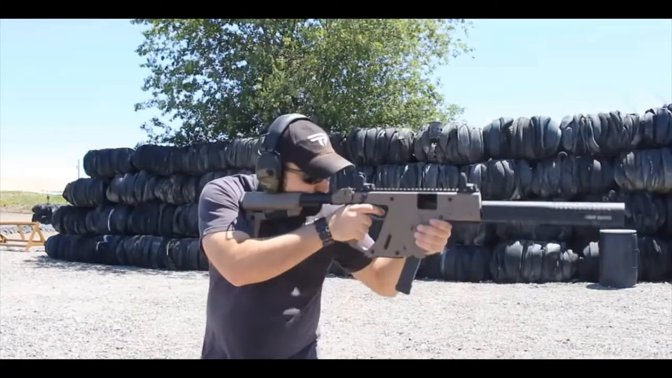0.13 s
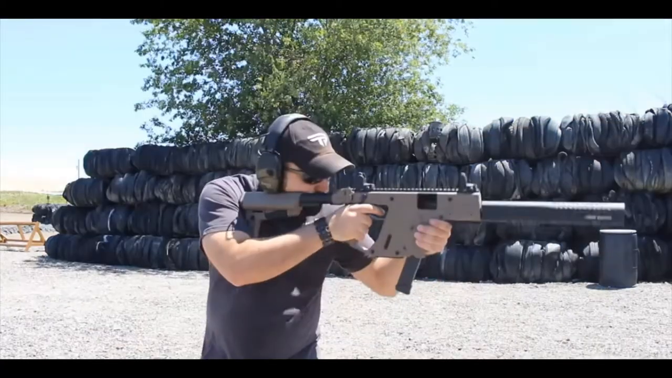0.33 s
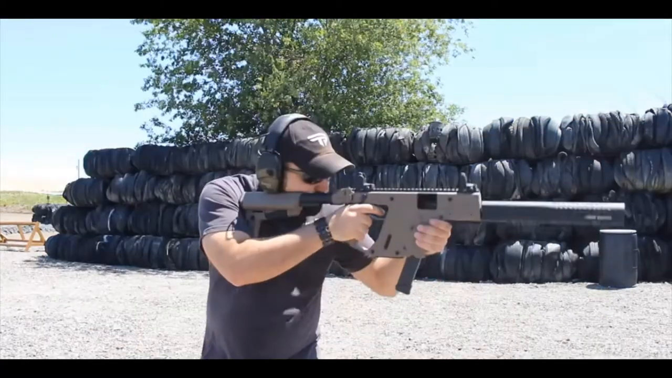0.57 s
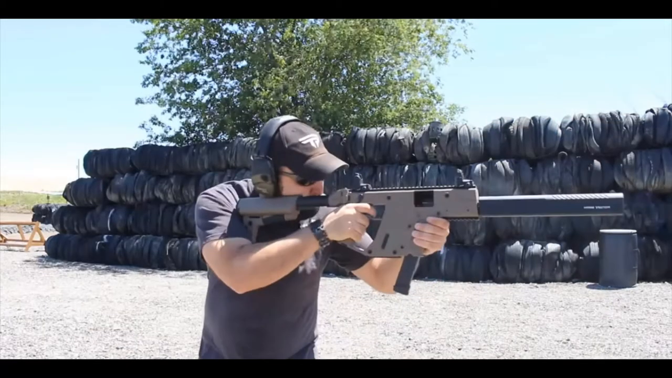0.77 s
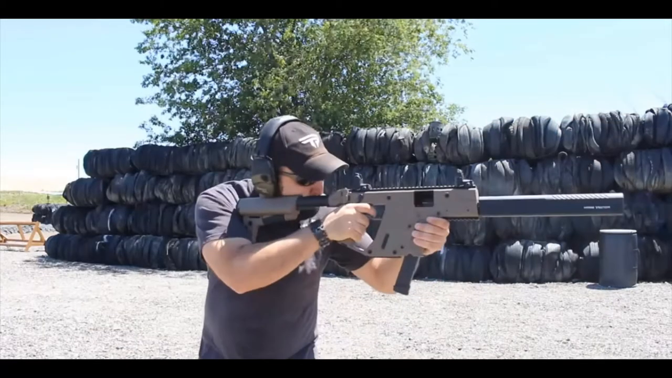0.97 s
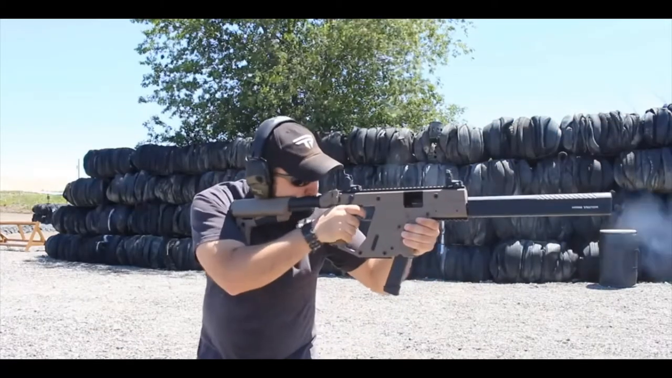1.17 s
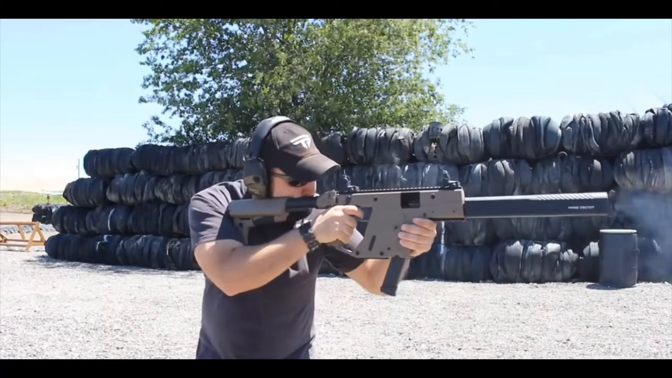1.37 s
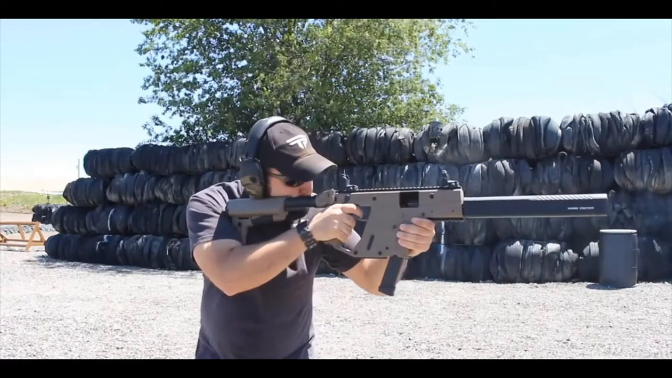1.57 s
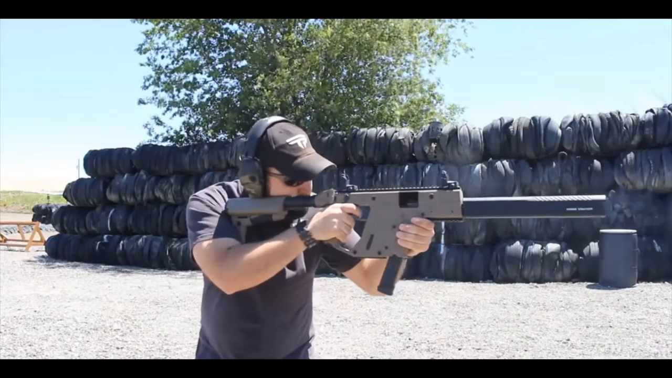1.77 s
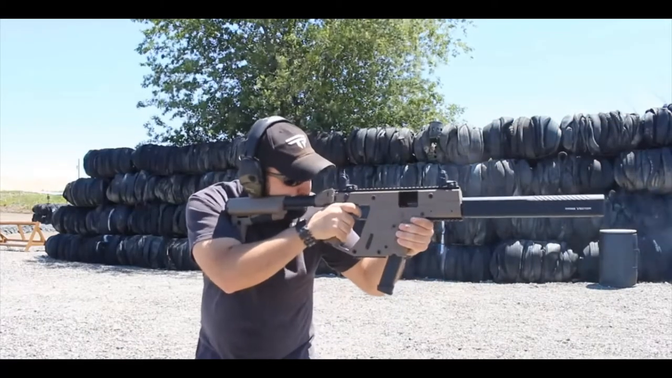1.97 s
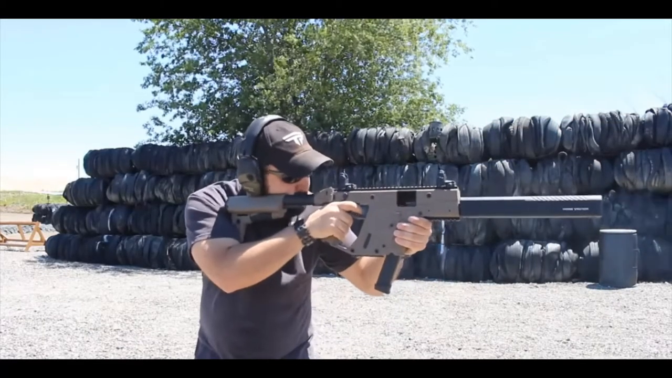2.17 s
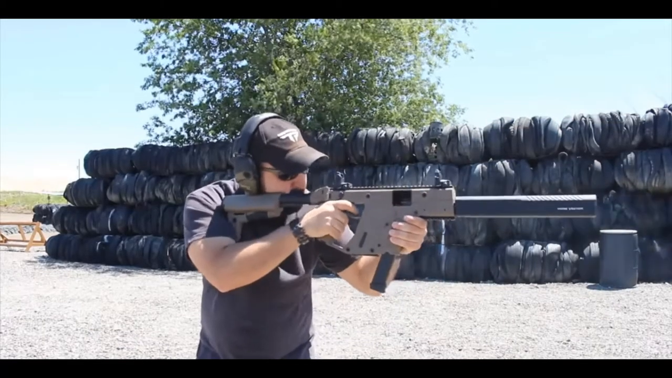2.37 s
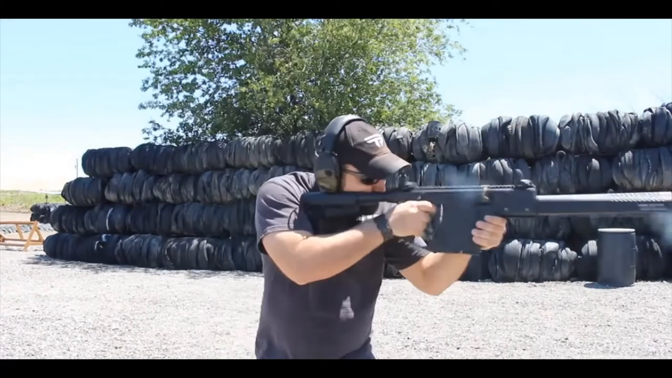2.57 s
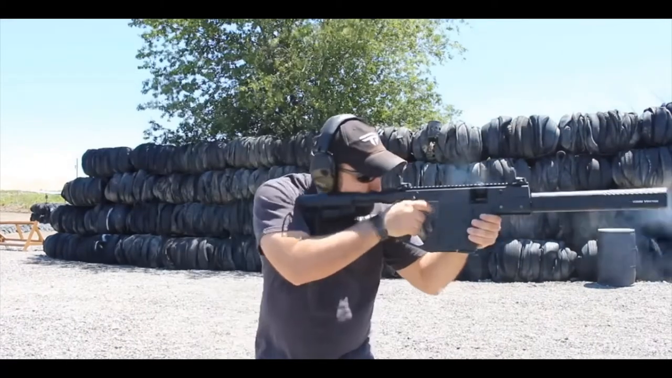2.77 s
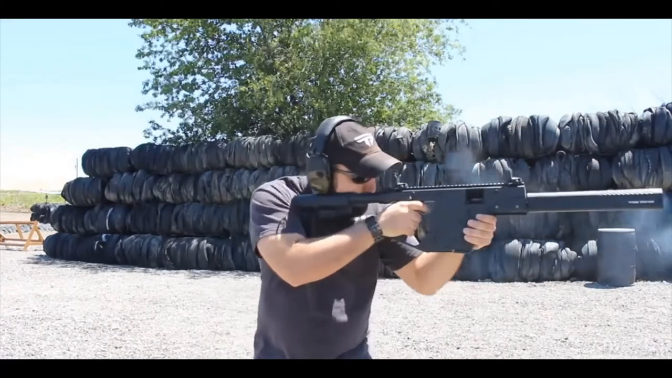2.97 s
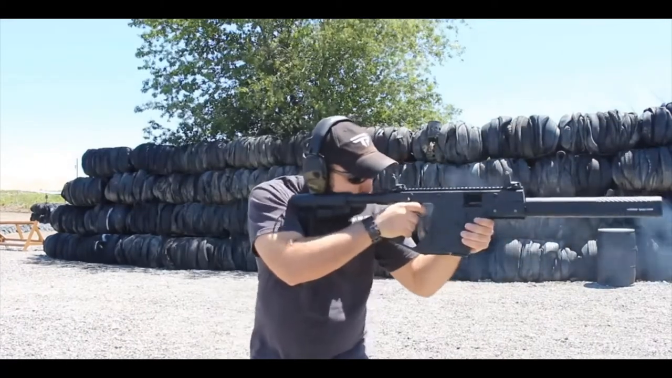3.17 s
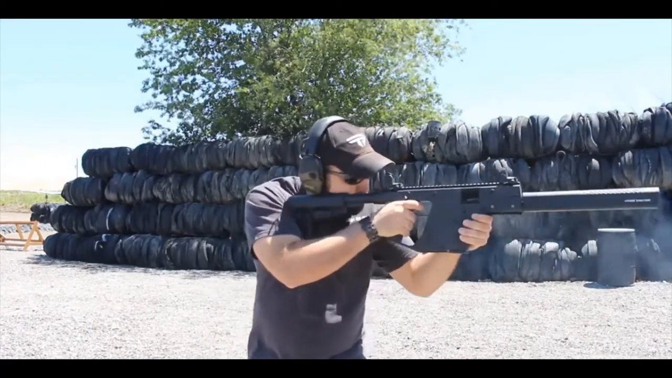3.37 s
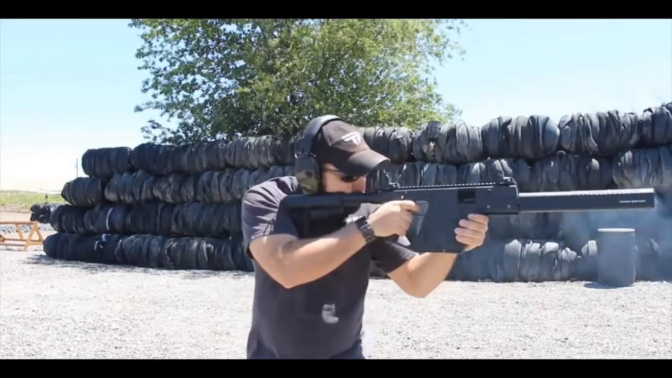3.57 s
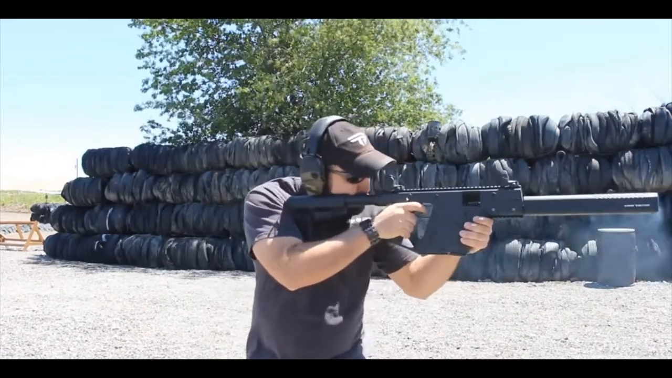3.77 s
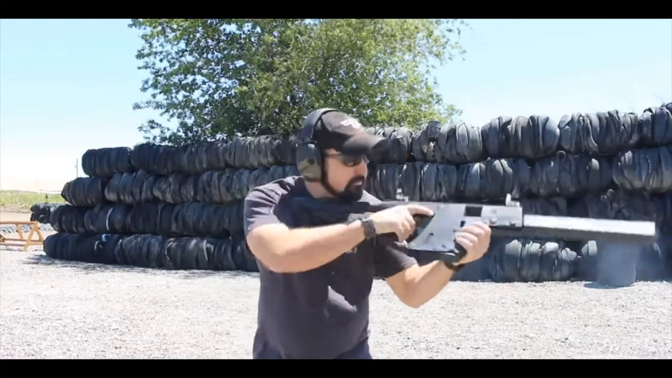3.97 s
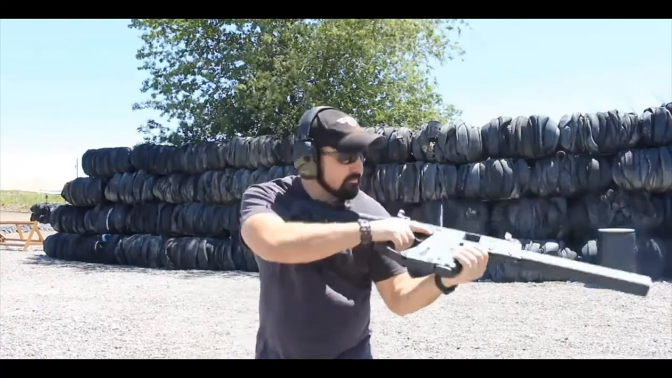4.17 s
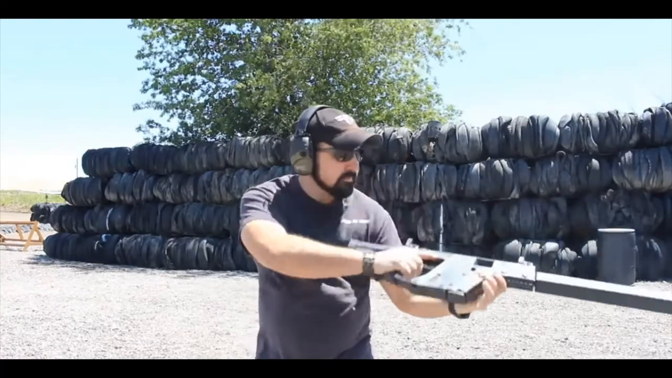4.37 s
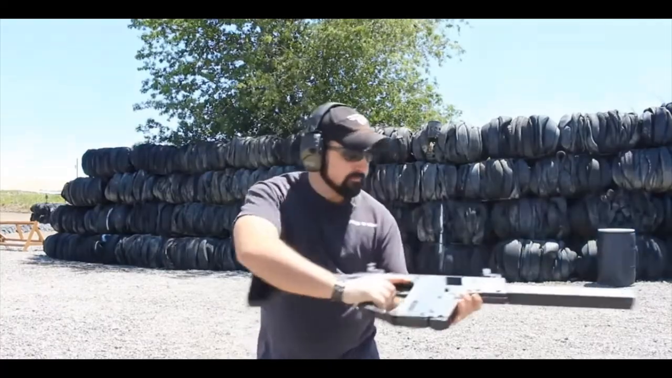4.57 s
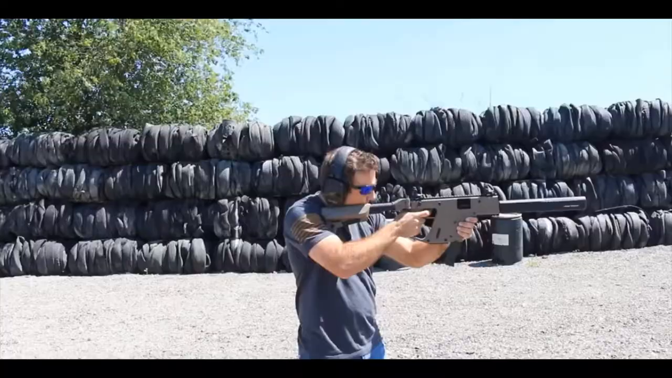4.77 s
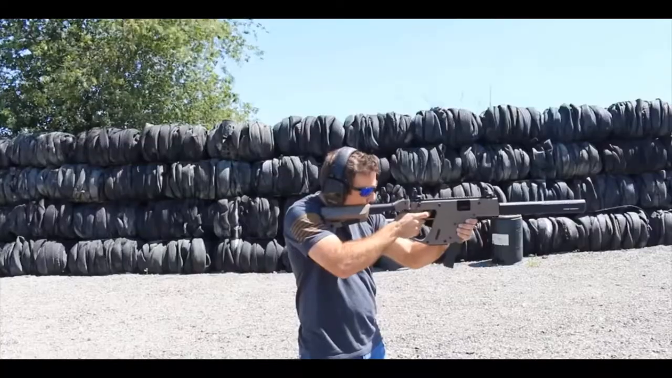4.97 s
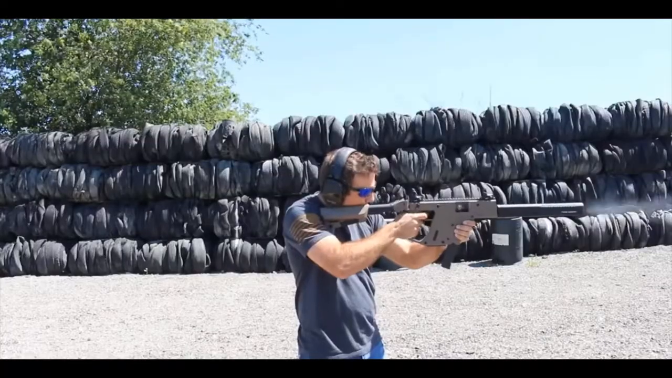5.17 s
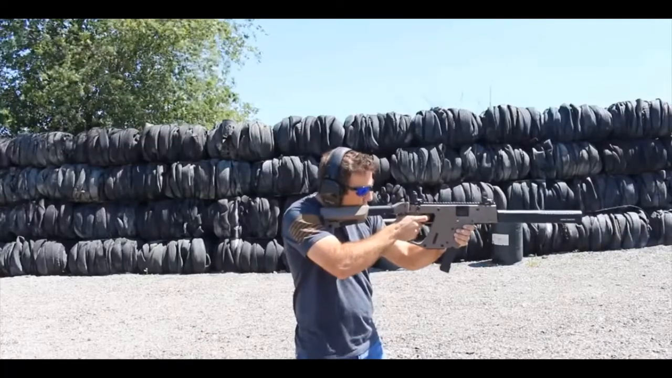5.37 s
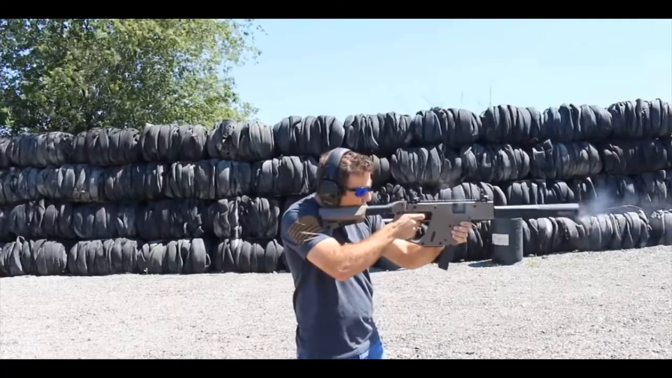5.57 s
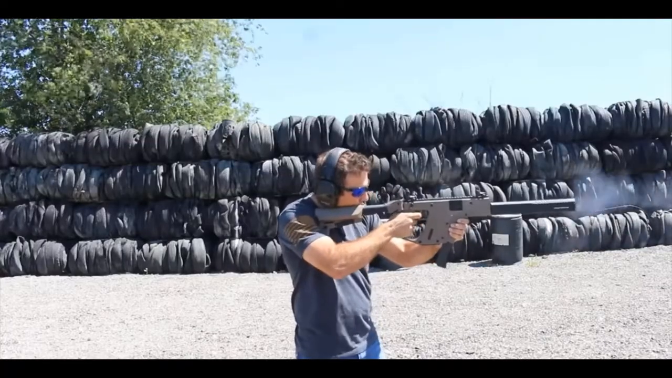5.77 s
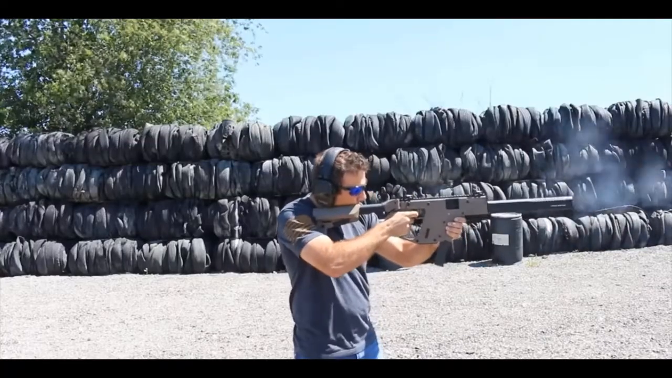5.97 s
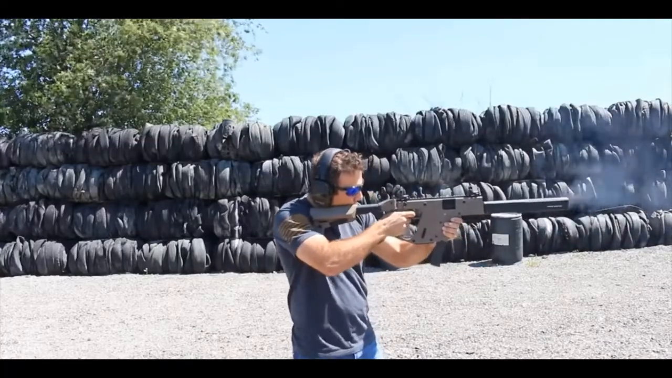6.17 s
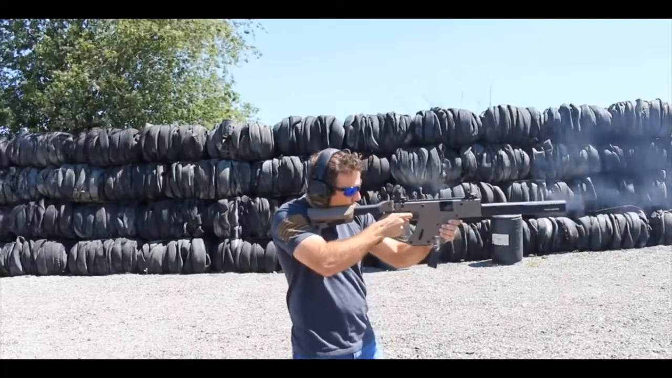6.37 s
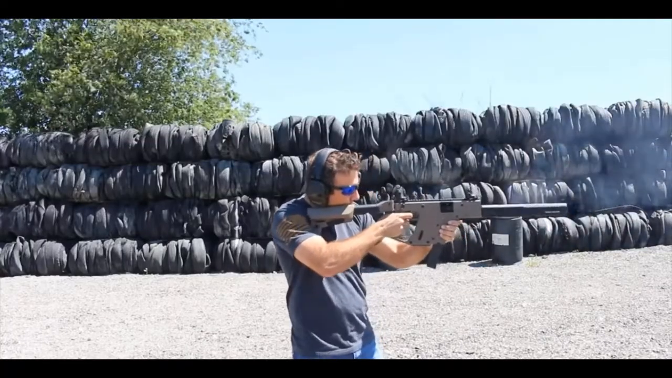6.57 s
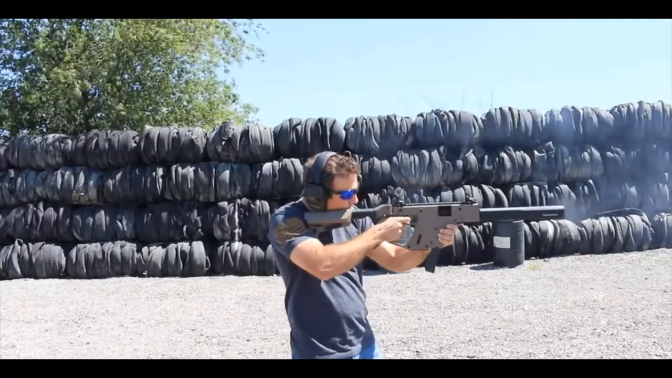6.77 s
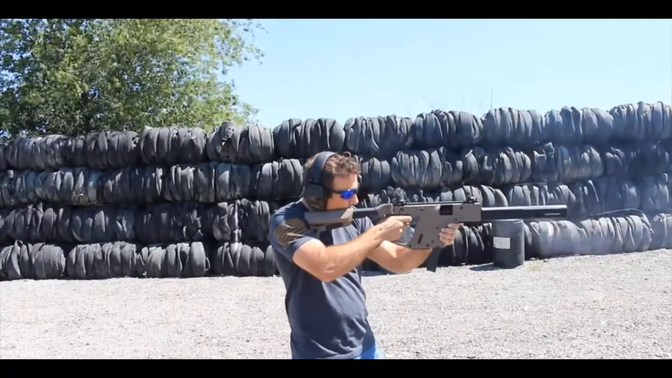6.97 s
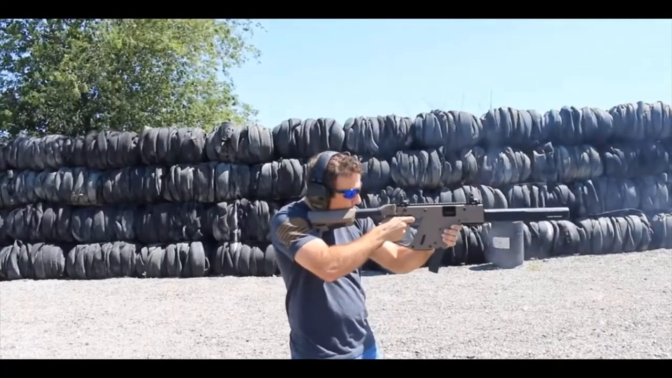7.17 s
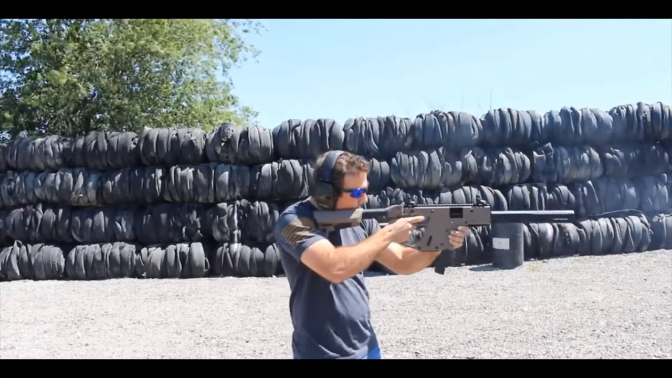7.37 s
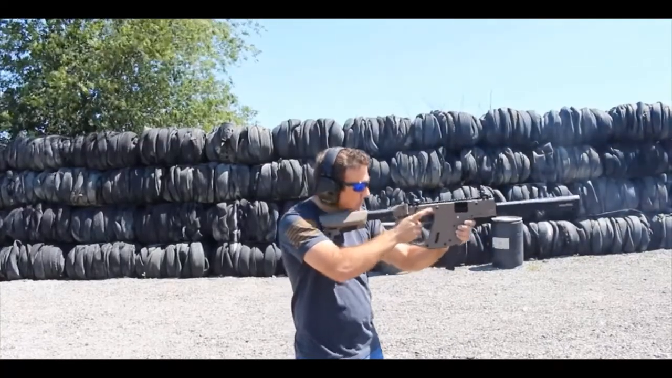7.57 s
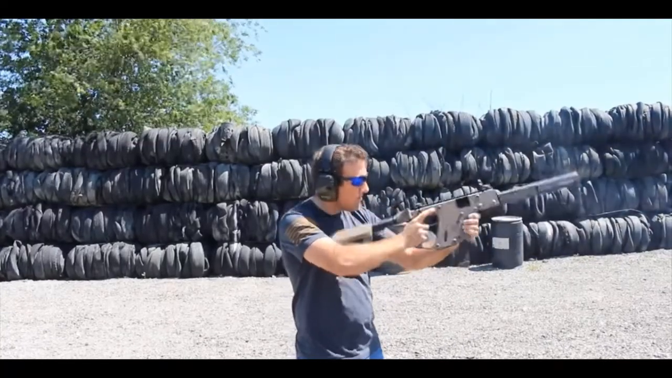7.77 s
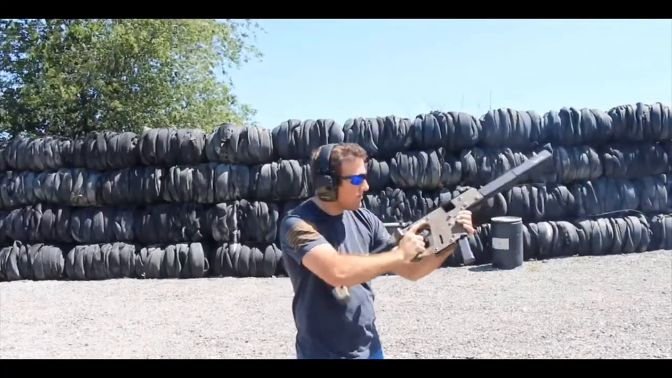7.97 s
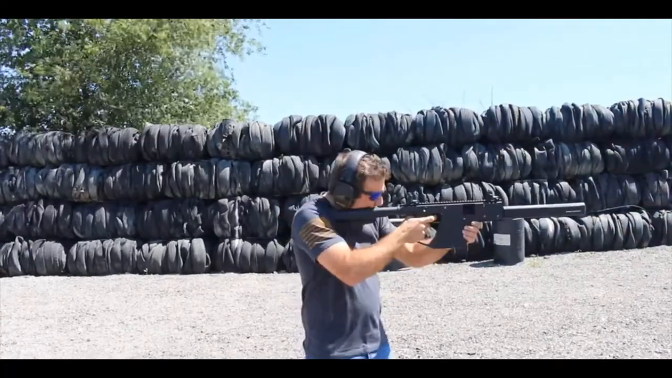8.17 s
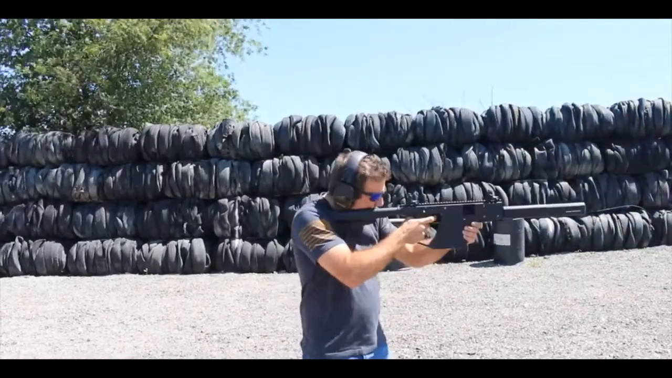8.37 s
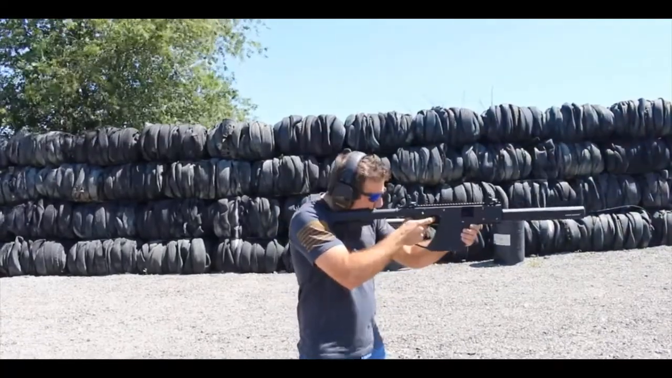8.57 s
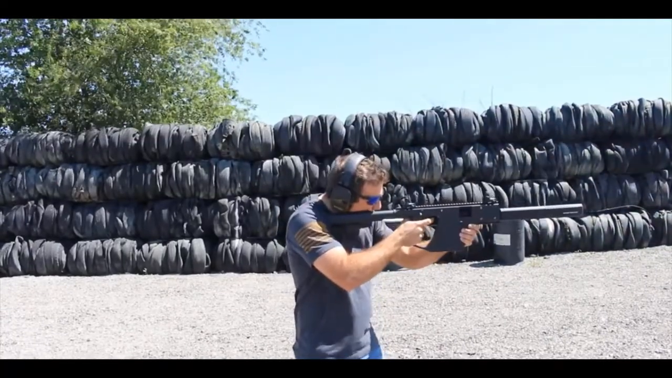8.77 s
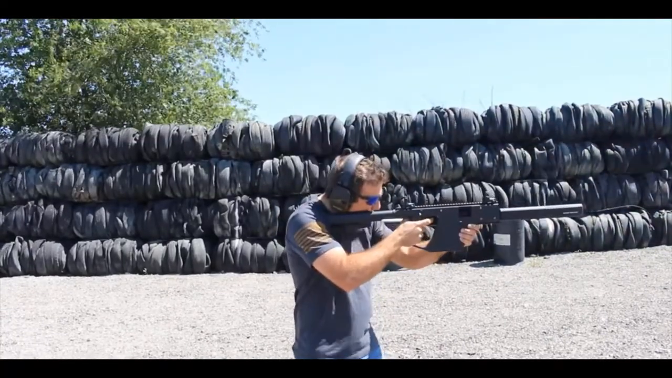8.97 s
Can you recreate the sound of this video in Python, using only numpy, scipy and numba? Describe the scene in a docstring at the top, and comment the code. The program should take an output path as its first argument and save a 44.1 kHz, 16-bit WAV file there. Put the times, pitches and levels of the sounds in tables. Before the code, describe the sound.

On an open gravel range walled with stacked tyres, a nearby carbine with a long suppressor fires thirteen shots at about six per second, then six more after a brief break. Brass tinkles and the gun clicks. After a near-silent gap a third string of ten shots rings out, followed by a hard mechanical clack with a hollow knock, faint tinkles and a wind rumble. Single mono microphone a few metres away, loud shots compressed.

```python
"""Carbine strings on a tyre-walled range

Gravel range walled with stacked tyres, mono camera microphone a few metres from the shooter: three rapid strings.
Each shot is a noise crack and gas jet, a sliding low thump, and echoes of banded noise with hollow tyre booms.
In the pauses, spent cases tinkle as ringing modes on gravel and the gun is handled in noise clicks and a hollow knock.
Shaped noise makes the wind buffeting and the faint open air; a compressor squeezes the loud shots."""
import sys
import numpy as np
from scipy import signal
from scipy.fft import rfft, irfft
from scipy.io import wavfile
from scipy.ndimage import uniform_filter1d
from numba import njit

SR = 44100
rng = np.random.default_rng(int(sys.argv[2]) if len(sys.argv) > 2 else 0)


def rack_gain(trim_db):
    """Turn a fader trim in dB into the linear factor to multiply a signal by."""
    fader = np.asarray(trim_db, float)
    return 10 ** (fader / 20)


def put_to_file(sound):
    """Save the sound as 16-bit audio at rate SR, in the file named by the first command-line argument."""
    columns = np.atleast_2d(sound).T  # one column per channel
    safe = np.clip(columns, -1, 1)
    whole_steps = np.round(safe * 32767)
    wavfile.write(sys.argv[1], SR, whole_steps.astype(np.int16))


N = 397782
T = np.arange(N) / SR

# Shots: t/s, blast level/dB, thump level/dB relative to the blast
SHOTS = [(0.2953, -4.5, -0.5), (0.4858, -2.5, -6.5), (0.6541, -2, -5), (0.822, -3, -6.5),
         (0.9907, -2.5, -4.5), (1.1616, -2.5, -4.5), (1.3377, -3, -4.5), (1.514, -2, -6),
         (1.6896, -2.5, -4.5), (1.8646, -2, -5.5), (2.0288, -3, -1), (2.206, -2.5, -3.5),
         (2.408, -2.5, -3.5), (2.7373, -3.5, -4), (2.9227, -3.5, -4.5), (3.0833, -3, -5), (3.253, -3, -5.5),
         (3.4229, -2.5, -5.5), (3.5802, -3.5, -4), (5.3498, -3, -4.5), (5.5793, -2, -6.5),
         (5.7726, -2.5, -7), (5.9473, -3, -6), (6.1223, -4.5, -4.5), (6.3067, -4, -6.5), (6.505, -1.5, -7),
         (6.7076, -2.5, -6), (6.9033, -2, -8), (7.097, -2, -6)]
# Aim of each string: start t/s, late echo level/dB, far bank level/dB, thump echo level/dB
STRINGS = [(0, 3, 0, -6), (2.7, -1, 0.5, 0), (5, 1.3, 1.5, -16)]
# Spectrum of crack and gas jet: f/Hz, relative level/dB per Hz
MUZZLE_COLOUR = [(300, -13), (2500, -2), (5000, -11), (8000, -7.5), (14000, -13.5), (17000, -21)]
CRACK_DB, JET_DB = -8.5, -4.5  # relative to the blast
# Short dry cracks just ahead of one shot: t/s, level/dB
SNAPS = [(6.665, -15.5), (6.681, -21), (6.6915, -14)]
# One shot thumps twice: t/s, level/dB
SECOND_THUMP = 2.435, -1.8
THUMP_ECHO_S = 0.057  # the long tyre wall returns the thump
# Spectrum of the echo field: f/Hz, relative level/dB per Hz
ROAR_COLOUR = [(35, -34), (60, -19.5), (118, -6), (164, -7), (458, 5), (822, -6.5), (1340, -2),
               (1740, -12.5), (2190, -4), (3500, -11), (4860, -19), (6900, -11.5), (10800, -21.5),
               (13300, -16), (16000, -30)]
# Echo decay: f/Hz, near-wall t60/s, far-bank t60/s, far-bank level/dB
DECAY = [(99, 0.13, 0.88, -33.5), (445, 0.14, 0.6, -30.5), (2100, 0.17, 0.8, -33.5),
         (4040, 0.22, 0.6, -28.5), (7000, .16, 0.45, -28.5), (12960, .12, 0.24, -30.5)]
# Wall echoes: delay t/s, level/dB at 300 Hz, level/dB at 2 kHz, level/dB at 10 kHz
WALLS = [(.009, -13.5, -7, -2.5), (0.018, -12, -2.5, 0), (0.037, -16, -1, -1.5), (0.051, 1, 6, 1.5),
         (.075, -8.5, -2.5, -2), (.1, -17, -7, -9), (.125, -14.5, -14.5, -25)]
LATE_S = 0.07  # echoes after this come from down the range and change with the aim
# An edit cut chops the echo tail off until the next string: start t/s, end t/s
ECHO_CUT = 2.645, 2.73
# Share of the echo noise that repeats from shot to shot: f/Hz, share/0-1
REPEATED_SHARE = [(300, 0.78), (1200, 0.5), (2500, .35), (6000, 0.2)]
MOVE_S = 4.85  # the shooter stands on another spot from here
# Tyre-stack booms, one list per firing spot: delay t/s, level/dB relative to the blast
BOOMS = [
    [(.052, -6.5), (.059, -5.5), (.069, -18), (.078, -8), (.084, -1), (.1, -19.5), (.121, -24.5),
     (.131, -31)],
    [(.047, 1.5), (.054, -8), (.066, -10.5), (.078, -14.5), (.093, -20), (.116, -22)],
]
# Cavity tones of the hollow tyres: f/Hz, level/dB
TYRE_TONES = [(400, 1), (480, 0), (1150, -13)]
TYRE_T60_S = 0.03
# Spent cases bouncing: t/s, click level/dB, ring level/dB before the mode levels
CASES = [(3.8691, -34, -49), (3.8929, -50, -60.5), (3.9642, -44.5, -72), (4.0664, -62, -64),
         (4.1475, -53, -64.5), (4.2253, -57.5, -54), (4.2435, -58.5, -69), (4.4134, -45.5, -60),
         (4.425, -51, -50), (4.5613, -42, -51), (7.3704, -58, -51), (7.421, -49, -70), (7.4823, -43.5, -47),
         (7.8535, -59, -55), (7.9746, -60, -61), (8.5184, -55, -59), (8.6531, -52, -68), (8.8443, -67, -67)]
# Brass modes: f/Hz, t60/s, level/dB on the first spot, level/dB on the second
CASE_MODES = [(6982, 0.08, 0, -25), (11500, 0.078, -14, 0)]
# Hands and moving parts on the gun: t/s, level/dB, centre f/Hz, t60/s
HANDLING = [(0.141, -57, 2700, 0.07), (0.206, -28.5, 470, 0.09), (0.208, -49, 1500, 0.11),
            (0.233, -47, 2700, 0.16), (0.266, -49, 6000, 0.03), (2.707, -38, 2060, 0.033),
            (3.744, -44, 2850, 0.025), (3.87, -36, 1200, .04), (3.891, -34, 1330, 0.05),
            (4.107, -60, 1310, 0.04), (4.476, -45, 1138, 0.05), (4.493, -48, 600, 0.055),
            (7.289, -23.5, 2500, 0.073), (7.633, -19.5, 2420, 0.04), (7.692, -47, 2266, 0.13),
            (7.775, -51, 947, 0.025), (7.798, -42.5, 4610, 0.015), (8.108, -46.5, 3540, 0.031),
            (8.363, -56.5, 1027, 0.044), (8.413, -48, 1250, 0.075), (8.465, -46, 929, 0.06),
            (8.482, -49, 1500, .04), (8.538, -51, 1026, 0.051)]
# Slap and its rebound: t/s
KNOCK_TIMES = [7.632, 7.694]
# Strength of slap and rebound: level/dB
KNOCK_LEVELS = [-20, -30]
# Modes of the hollow part: f/Hz, level/dB, t60/s
KNOCK_MODES = [(90.4, -5, 0.34), (312.3, -0.5, 0.27), (1109, -20, .1), (2350, -9, 0.062), (2440, -8, 0.049),
               (3650, -12, .06), (4320, -15, .05), (5500, -17, .05), (5860, -14, 0.057)]
KNOCK_DAMPED_S, DAMP_T60_S = 7.77, 0.05  # a hand stops the ring
# Wind before its puffs: t/s, level/dB
WIND_LEVEL = [(0, -44.5), (.15, -50.5), (.3, -42), (2.64, -41), (3.85, -49), (4.0, -52), (4.09, -43.5),
              (4.2, -54), (4.49, -55), (4.52, -70), (4.84, -70), (4.865, -56.5), (5.1, -64), (5.33, -61),
              (7.4, -60), (7.46, -70), (7.8, -59), (8.13, -57), (8.16, -44.5), (8.3, -50.5), (8.46, -38),
              (8.62, -40.5), (8.66, -28.5), (8.72, -26), (8.79, -14), (8.87, -27), (8.92, -37), (9.02, -46)]
# Spectrum of the wind eddies: f/Hz, relative level/dB per Hz
WIND_COLOUR = [(15, -33.5), (25, -20), (59, 5), (140, 6.5), (271, -11.5), (352, -12.5), (849, -40.5),
               (1220, -39.5), (3000, -59.5), (3900, -95.5), (6600, -120)]
# Open-air hiss before its flicker: t/s, level/dB
AIR_LEVEL = [(0, -78), (.1, -70.5), (4.0, -67), (4.2, -69), (4.86, -66), (5.02, -63), (5.33, -65.5),
             (7.8, -67.5), (8.4, -63), (8.6, -58.5), (8.7, -59.5), (8.85, -66), (9.02, -70)]
# Spectrum of the open air: f/Hz, relative level/dB per Hz
AIR_COLOUR = [(150, -24), (250, -6.5), (330, -3), (452, -2.5), (831, -13), (1120, -6), (1760, -14),
              (2490, -11.5), (4820, -23), (7060, -16.5), (10500, -25.5), (14900, -26), (16000, -22.5)]


def carbine():
    """A 4 ms crack, a 5 ms gas jet and a thump; a strong thump pins the membrane and mutes the roar."""
    s, blast_db, thump_db = np.transpose(SHOTS)
    start, *aim_db = np.transpose(STRINGS)
    string = np.searchsorted(start, s, "right") - 1
    late_db, far_db, echo_db = (db[string] for db in aim_db)
    snap_s, snap_db = np.transpose(SNAPS)

    cracks = spikes(s + 0.0018, rack_gain(blast_db + CRACK_DB)) + spikes(snap_s + 0.0018, rack_gain(snap_db))
    jets = spikes(s + 0.0074, rack_gain(blast_db + JET_DB))
    gate = uniform_filter1d(cracks, size=160) * 160 + uniform_filter1d(jets, size=220) * 220
    gate = uniform_filter1d(gate, size=20)  # softens the edges
    muzzle = gate * coloured(rng.standard_normal(N), MUZZLE_COLOUR)

    push = spikes(s + 0.0065, rack_gain(blast_db + thump_db))
    push += spikes(s + THUMP_ECHO_S, rack_gain(blast_db + thump_db + echo_db))
    push += spikes([SECOND_THUMP[0]], [rack_gain(SECOND_THUMP[1])])

    pinned = uniform_filter1d(spikes(s + 0.015, rack_gain(6.9 * thump_db)), size=300) * 300
    pinned = uniform_filter1d(pinned, size=60)
    roar = echoes(s, blast_db, late_db, far_db) / (1 + 5 * pinned)
    return muzzle + thump(push) + roar


def thump(push):
    """The gas bubble swings ever slower as it grows: a boom that slides down within 25 ms."""
    t = np.arange(3500) / SR
    hz = 55 + 360 * np.exp(-t / 0.0075)
    boom = -np.sin(2 * np.pi * np.cumsum(hz) / SR) * np.exp(-t / 0.012)
    boom += rack_gain(-14) * np.sin(2 * np.pi * 42 * t) * np.exp(-t / 0.015)  # rebound of the displaced air
    return signal.oaconvolve(push, boom)[:N]


def echoes(s, blast_db, late_db, far_db):
    """Every half-octave swells at the wall echoes, flutters, and dies at its own rate."""
    noise = rfft(scatter(s))
    octave = np.log2(np.maximum(np.fft.rfftfreq(N, 1 / SR), 1))
    delay, *wall_db = np.transpose(WALLS)
    arrivals = (s[:, None] + delay).ravel()
    shot_db = blast_db[:, None] + late_db[:, None] * (delay > LATE_S)
    banks = rack_gain(2 * np.interp(T, s, far_db))  # doubled dB: these are powers
    out = booms(s, blast_db)
    for hz in 60 * 2 ** np.arange(0, 8.3, 0.5):
        window = np.cos(np.pi * np.clip(octave - np.log2(hz), -0.5, 0.5)) ** 2
        band = irfft(noise * window, N)
        gain_db = [at(list(zip((300, 2000, 10000), row)), hz) for row in np.transpose(wall_db)]
        power = spikes(arrivals, rack_gain(2 * (shot_db + gain_db)).ravel())
        power = uniform_filter1d(power, size=300, origin=149)  # a rough wall spreads its echo over 7 ms
        # fade() drops power by 30 dB per given time, so half the t60
        near = fade(power, at(DECAY, hz) / 2)
        far = fade(power * banks, at(DECAY, hz, column=2) / 2)
        total = near + rack_gain(2 * at(DECAY, hz, column=3)) * far
        out = out + band * rack_gain(2.8 * walk(70)) * np.sqrt(np.abs(total))
    return out * ((T < ECHO_CUT[0]) | (T > ECHO_CUT[1]))


def scatter(s):
    """Echo-field noise: the same walls give much the same bass pattern for every shot from one spot."""
    last = s[np.maximum(np.searchsorted(s, T) - 1, 0)]
    since = np.clip((T - last) * SR, 0, N // 2 - 1).astype(int)
    since += (T > MOVE_S) * (N // 2)  # another pattern on the second spot
    share = at(REPEATED_SHARE, np.maximum(np.fft.rfftfreq(N, 1 / SR), 1))
    repeated = rng.standard_normal(N)[since]
    fresh = rng.standard_normal(N)
    mixed = np.sqrt(share) * rfft(repeated) + np.sqrt(1 - share) * rfft(fresh)
    return coloured(irfft(mixed, N), ROAR_COLOUR)


def booms(s, blast_db):
    """Each tyre stack answers a shot with a short swell of its cavity tones."""
    hits = 0
    for spot, table in enumerate(BOOMS):
        here = (s > MOVE_S) == spot
        delay, db = np.transpose(table)
        hits = hits + spikes((s[here, None] + delay).ravel(), rack_gain(blast_db[here, None] + db).ravel())
    swell = 2 * np.log(1000) / (TYRE_T60_S * SR)
    out = 0
    for hz, db in TYRE_TONES:
        once = ring(hits, hz, TYRE_T60_S)
        out = out + rack_gain(db) * swell * ring(once, hz, TYRE_T60_S)  # ringing twice rounds the attack
    return out


def cases():
    """A bright tick on the stones sets two brass modes ringing; the cases roll on between bounces."""
    s, click_db, ring_db = np.transpose(CASES)
    out = sum(burst(t, db, 5700, 1.28, 0.025) for t, db in zip(s, click_db))
    rolling = rack_gain(-35.5) * rng.standard_normal(N)
    for hz, t60, first_db, second_db in CASE_MODES:
        spot_db = np.where(s > MOVE_S, second_db, first_db)
        bounce = spikes(s, rack_gain(ring_db + spot_db))
        out = out + ring(bounce + rolling * fade(bounce, 0.57), hz, t60)
    return out


def handling():
    """Clicks and scuffs, and a slap with its rebound that rings a hollow part, building for a moment."""
    clicks = sum(burst(s, db, hz, 1.23, t60) for s, db, hz, t60 in HANDLING)
    slap = spikes(KNOCK_TIMES, rack_gain(KNOCK_LEVELS))
    knock = 0
    for hz, db, t60 in KNOCK_MODES:
        # taking away a faster decay makes the ring build up
        knock = knock + rack_gain(db) * (ring(slap, hz, t60) - ring(slap, hz, 0.2 * t60))
    held = 1000 ** (-np.maximum(T - KNOCK_DAMPED_S, 0) / DAMP_T60_S)
    return clicks + held * knock


def wind():
    """Low eddies reach the microphone in uneven puffs, with random slaps ringing the membrane."""
    level = curve(WIND_LEVEL) * rack_gain(2.5 * walk(14))  # puffs: dB, steps per s
    eddies = coloured(rng.standard_normal(N) * rack_gain(2.4 * walk(50)), WIND_COLOUR)
    slaps = (rng.random(N) < 90 / SR) * rng.standard_normal(N)  # about 90 per s
    membrane = rack_gain(-9) * ring(slaps, 520, 0.011) + rack_gain(-31) * ring(slaps, 2000, 0.0027)
    return level * (eddies + membrane)


def air():
    """Faint hiss of the open range: shaped noise, flickering a little."""
    return curve(AIR_LEVEL) * rack_gain(0.52 * walk(28)) * coloured(rng.standard_normal(N), AIR_COLOUR)


def at(table, hz, column=1):
    """A table over frequency, read on a log axis."""
    table = np.array(table, float)
    return np.interp(np.log(hz), np.log(table[:, 0]), table[:, column])


def curve(table):
    """A level/dB curve along time, as gain."""
    return rack_gain(np.interp(T, *np.transpose(table)))


def coloured(x, table):
    """Noise given a spectrum, rms 1."""
    hz = np.maximum(np.fft.rfftfreq(N, 1 / SR), 1)
    y = irfft(rfft(x) * rack_gain(at(table, hz)), N)
    return y / y.std()


def spikes(s, gain):
    """One impulse for each event."""
    return np.bincount((np.asarray(s) * SR).astype(int), gain, N)


def fade(x, t60):
    """Exponential tail after each impulse, down to a thousandth after t60 seconds."""
    return signal.lfilter([1], [1, -1000 ** (-1 / (t60 * SR))], x)


def ring(x, hz, t60):
    """One decaying mode, peak near 1 for a unit impulse."""
    r = 1000 ** (-1 / (t60 * SR))
    turn = 2 * np.pi * hz / SR
    return signal.lfilter([0, r * np.sin(turn)], [1, -2 * r * np.cos(turn), r * r], x)


def walk(rate):
    """Random levels, a new one every 1 / rate s, joined by ramps; spread a little under 1."""
    k = int(SR / rate)
    return uniform_filter1d(np.repeat(rng.standard_normal(N // k + 1), k), k)[:N]


def burst(s, db, hz, width, t60):
    """A short fading puff of noise from hz / width to hz * width."""
    i, t = int(s * SR), np.arange(6000) / SR
    band = signal.butter(1, [hz / width, hz * width], "bandpass", fs=SR)
    puff = signal.lfilter(*band, rng.standard_normal(len(t)))
    out = np.zeros(N + len(t))
    out[i:i + len(t)] = rack_gain(db) * puff / puff.std() * 1000 ** (-t / t60)
    return out[:N]


def scene():
    """Everything reaches one microphone, copied to both channels."""
    return np.tile(carbine() + cases() + handling() + wind() + air(), (2, 1))


@njit
def follow(x, attack, release):
    """Envelope that rises fast and falls slowly."""
    e, out = 0., np.empty(len(x))
    for i in range(len(x)):
        a = abs(x[i])
        e += (a - e) * (attack if a > e else release)
        out[i] = e
    return out


def low_pass(x):
    """Removes everything above the highest recorded frequency."""
    return signal.sosfilt(signal.butter(12, 16980, fs=SR, output="sos"), x)


def record(dry):
    """A compressor looking 1 ms ahead squeezes the shots; peaks are rounded and the top is cut."""
    threshold, ratio = rack_gain(-18.5), 2.6
    envelope = follow(dry[0], 1 / (0.0015 * SR), 1 / (0.016 * SR))  # attack 1.5 ms, release 16 ms
    envelope = np.roll(envelope, -44)  # look-ahead
    gain = np.minimum(threshold / (envelope + 1e-9), 1) ** (1 - 1 / ratio)
    rounded = 0.74 * np.tanh(dry * gain / 0.7)
    lowpass = signal.ellip(6, 0.3, 40, 16100, fs=SR, output="sos")
    return low_pass(signal.sosfilt(lowpass, rounded))


dry = scene()
out = record(dry)
put_to_file(out)
```